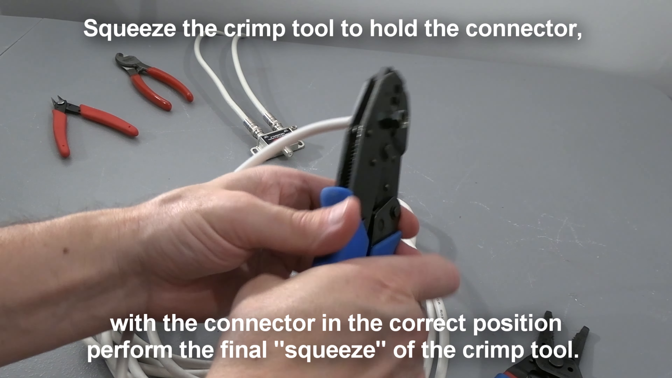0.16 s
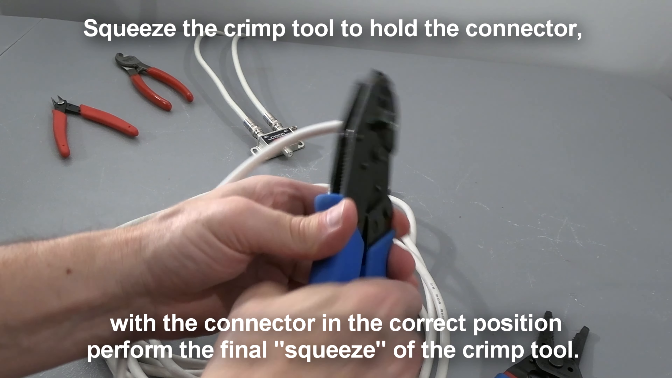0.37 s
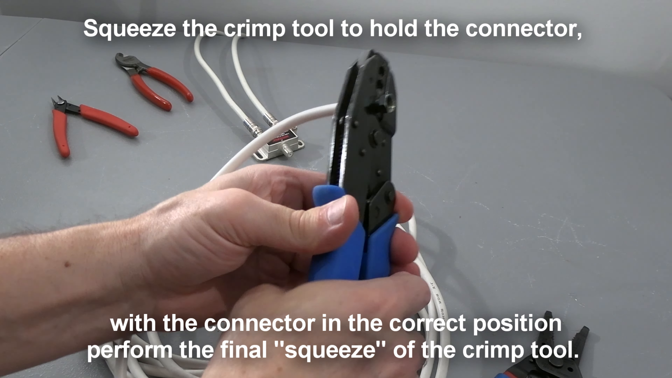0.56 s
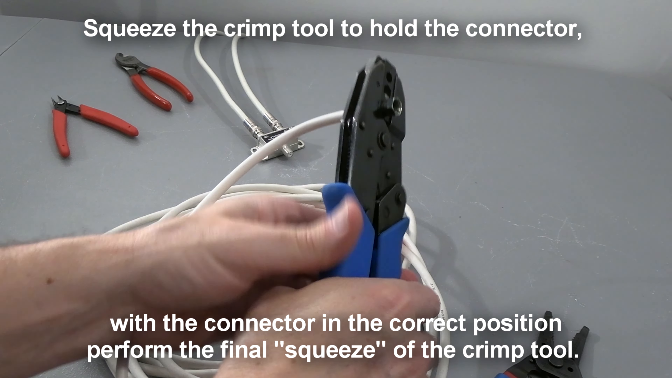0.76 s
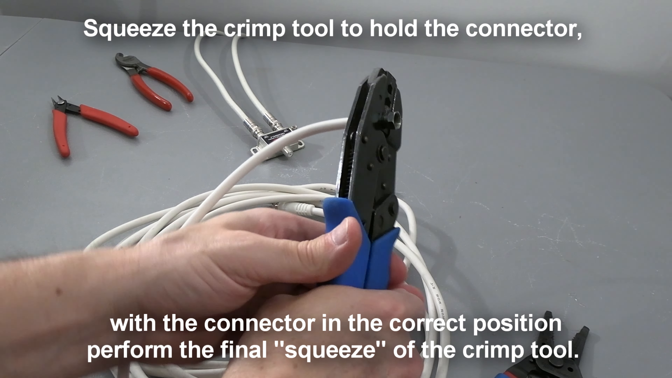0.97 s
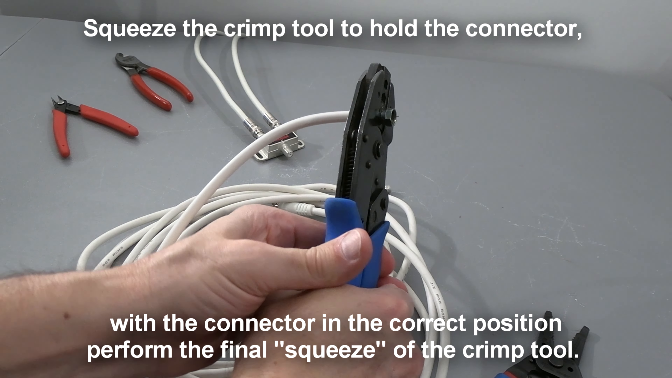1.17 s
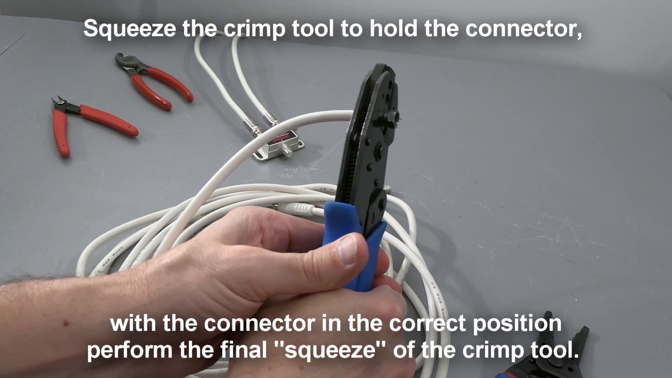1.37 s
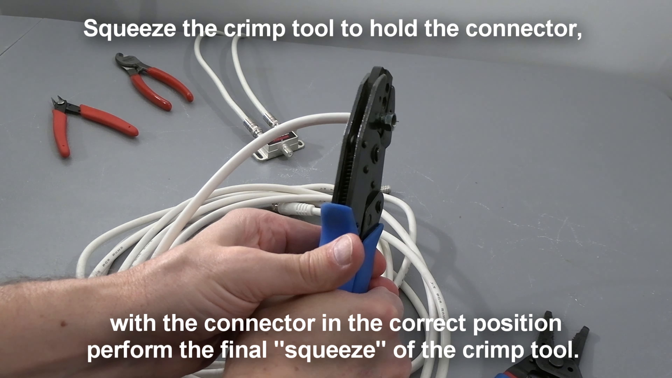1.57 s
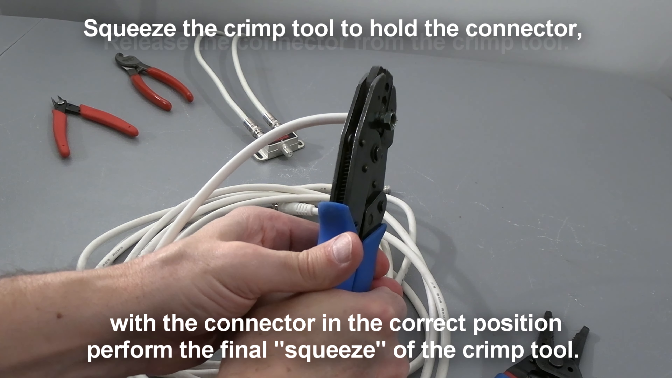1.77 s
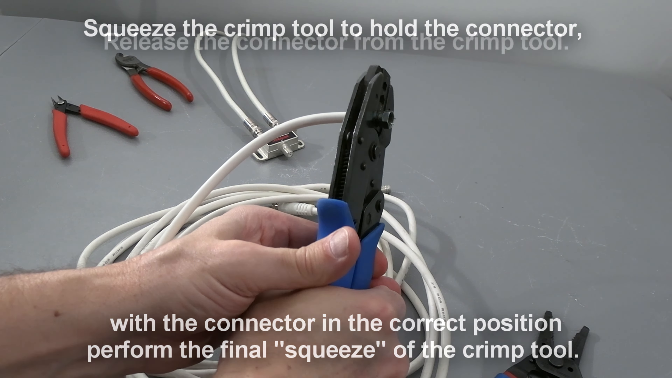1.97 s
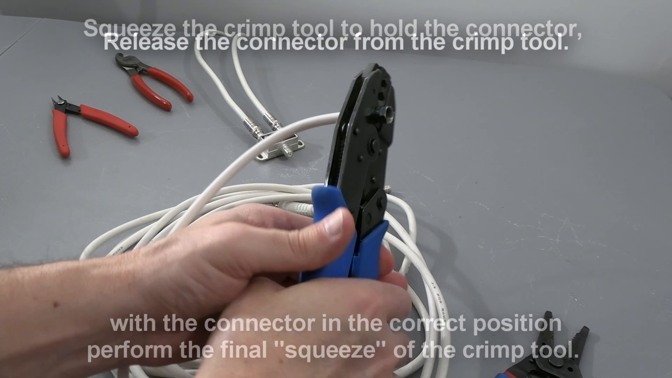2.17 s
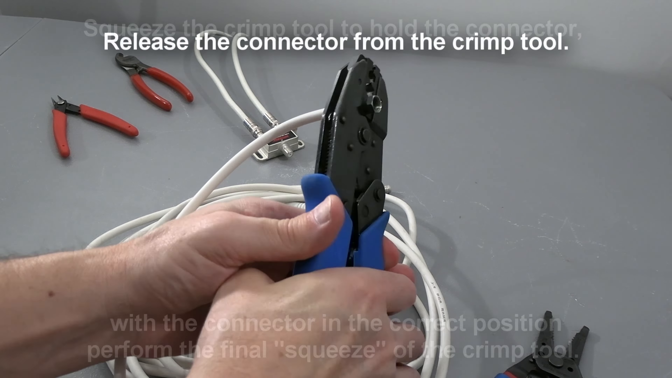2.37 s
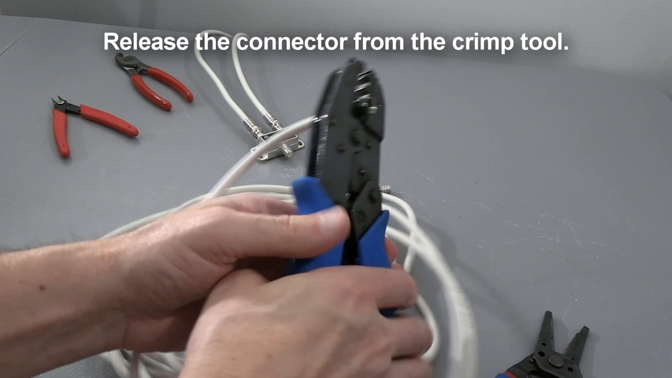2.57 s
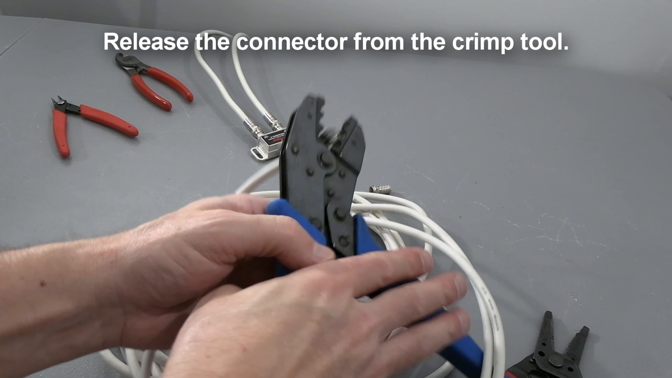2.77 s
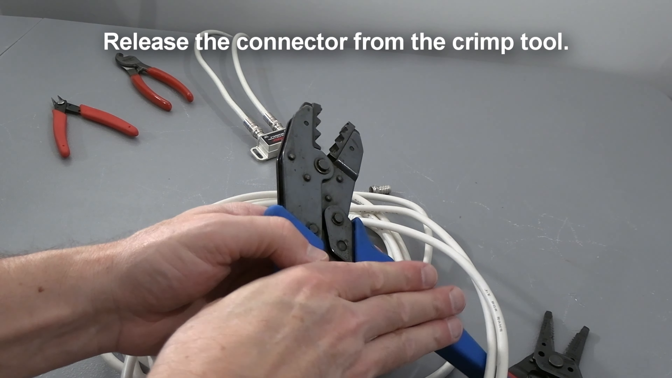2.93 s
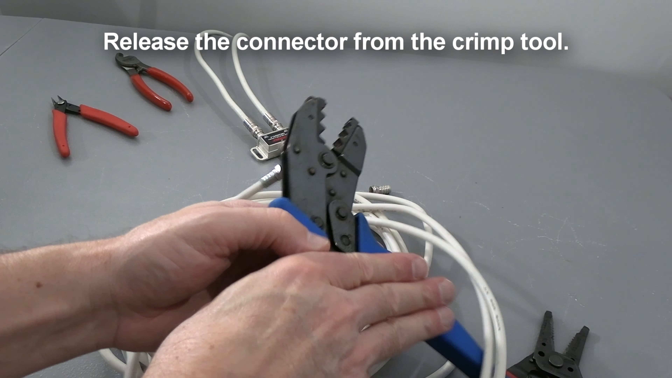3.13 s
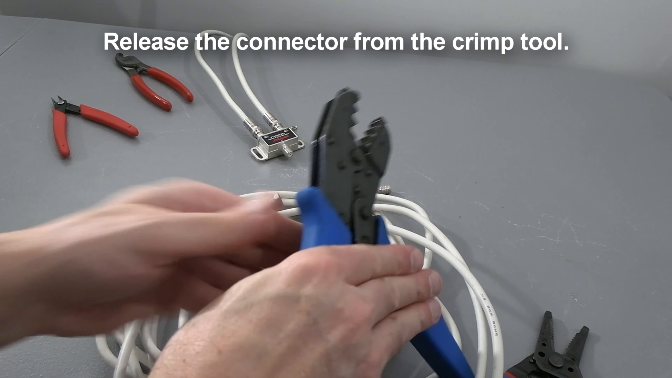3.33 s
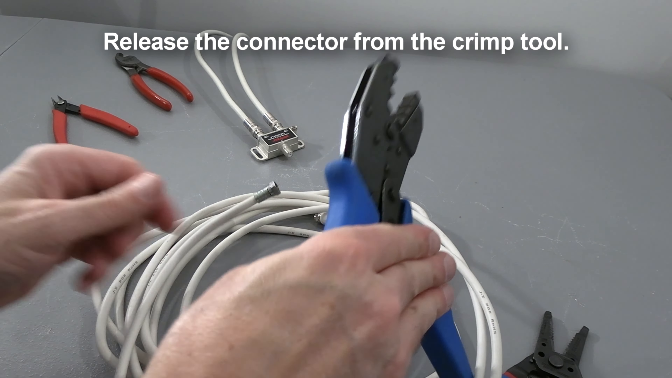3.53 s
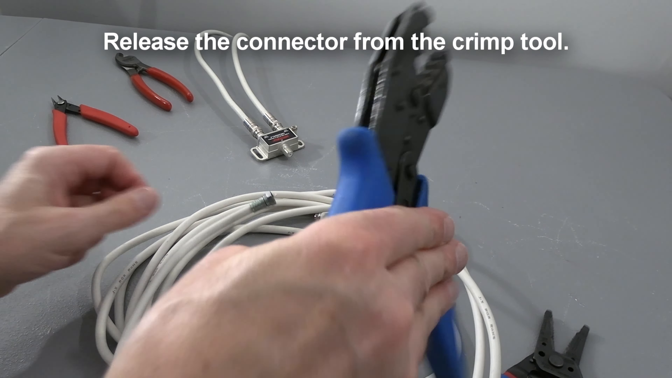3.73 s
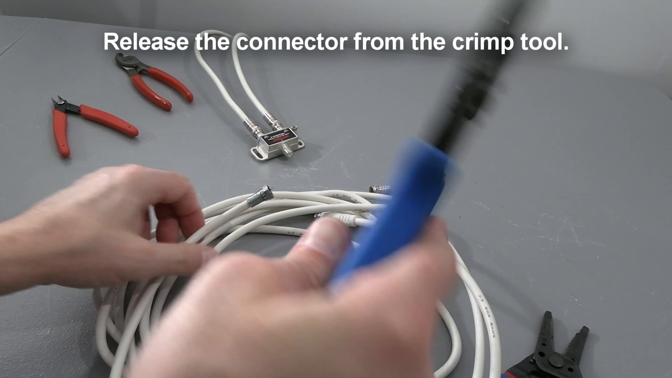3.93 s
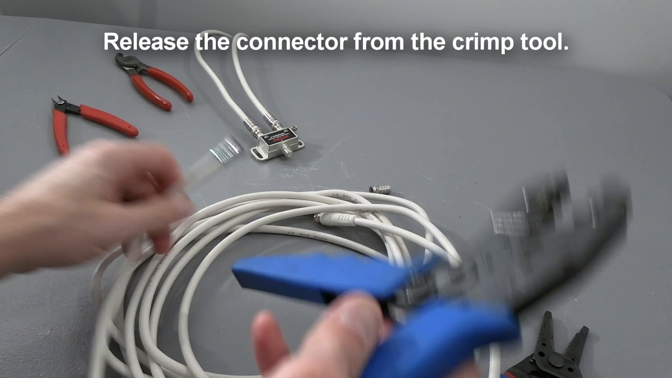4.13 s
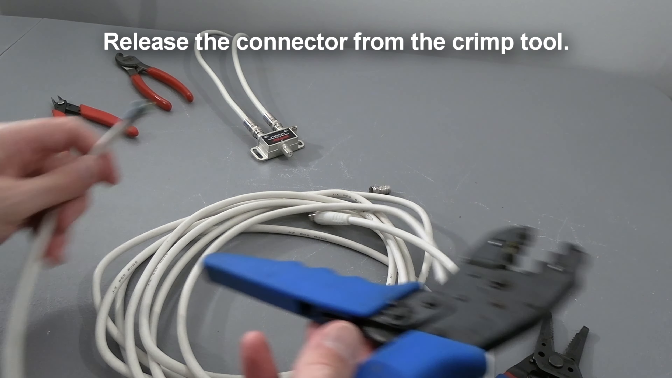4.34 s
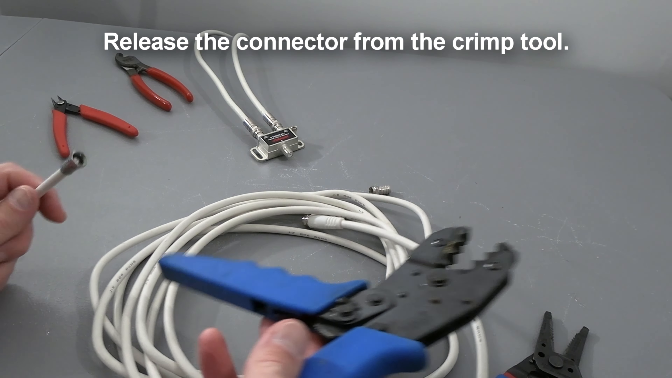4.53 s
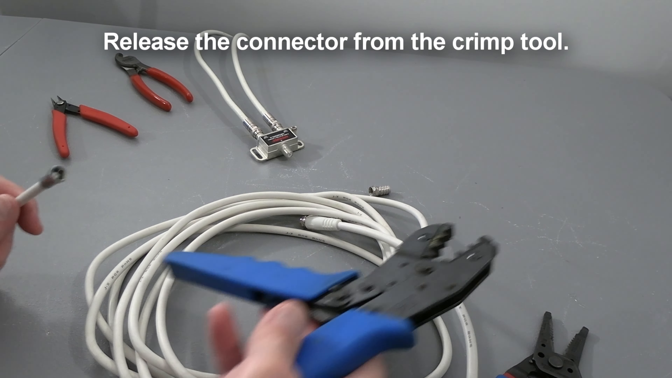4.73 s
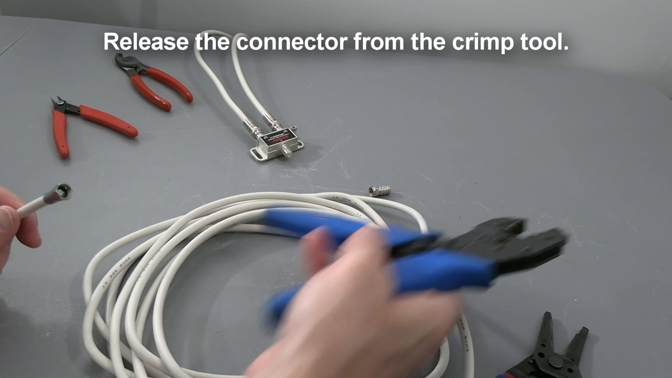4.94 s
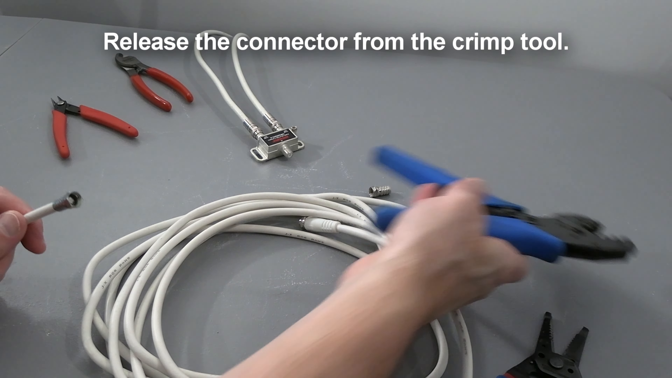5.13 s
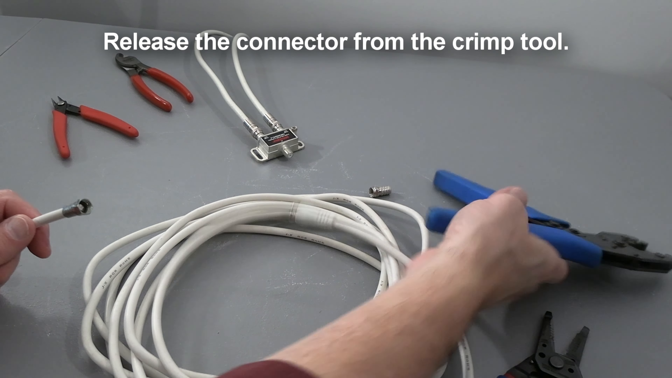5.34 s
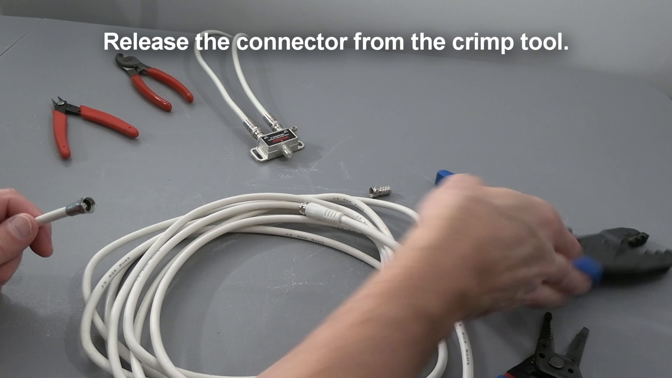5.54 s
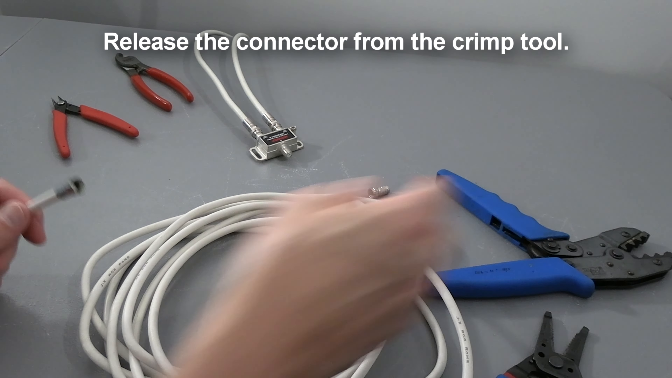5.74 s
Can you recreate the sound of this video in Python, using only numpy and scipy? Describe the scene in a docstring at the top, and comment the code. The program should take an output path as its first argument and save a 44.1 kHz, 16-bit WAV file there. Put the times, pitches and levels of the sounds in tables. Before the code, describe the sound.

A close stereo pickup in a small, fairly dry room with very faint air hiss. From 0.2 to 0.8 s there are weak steel ticks and light bumps of hands on a table. At about 1.0 s a ratchet tool gives one loud, crisp, short metal snap, followed by near quiet with barely any rubbing. At 2.3 to 2.4 s small ticks end in a clear click with a faint spring ring. From 2.6 to 2.8 s the pawl runs over about nine teeth, speeding into a bright rattle with the handle juddering. Soft bumps and grainy cable slides follow, with firmer knocks around 3.3 and 3.8 s, two muted low clicks near 4.1 s, and light knocks with a rustle at 4.3 to 4.6 s. After a lull, heavy clacks and thuds come at 5.4 to 5.5 s, then the loudest, a deep thud with hard rattle, at 5.7 s, trailing off with rubbing.

```python
"""In a small room, a ratcheting steel crimp tool is squeezed on a cable connector above a work table.
The jaws tick, the pawl snaps over teeth, then the ratchet runs free as the handles spring open.
Hands and cable bump and slide on the table, and the tool is put down on it with a few heavy clacks.
Steel and table are sums of damped modes with bursts of dense modes; sliding is grainy coloured noise;
the spring is pairs of beating sines; room reflections and a faint hush of air complete the field."""
import sys
import numpy as np
from scipy import signal
from scipy.fft import rfft, irfft, next_fast_len
from scipy.io import wavfile

SR = 44100
rng = np.random.default_rng(int(sys.argv[2]) if len(sys.argv) > 2 else 0)


def master_out(mix):
    """Clip the mix to full scale and print it as 16-bit PCM to the path in sys.argv[1]."""
    frames = np.transpose(np.atleast_2d(mix))
    ceiling = np.clip(frames, -1, 1)
    pcm = np.round(ceiling * 32767).astype(np.int16)
    wavfile.write(sys.argv[1], SR, pcm)


N = 255780
RING_S = .7  # longest ring computed
AGE = np.arange(int(RING_S * SR)) / SR  # seconds since a blow

# Room air and hiss: (frequency [Hz], density [dB per Hz, relative])
HUSH_SPECTRUM = [(15, -64), (25, -24), (242, -5.5), (270, -11.5), (463, -7.5), (591, -13.5), (641, -10.5),
                 (840, -2.5), (1020, -14), (1100, -7), (1610, -18), (1740, -14.5), (5140, -20),
                 (11900, -31.5), (16000, -60.5)]
HUSH_DB = -64.5

# Left-right likeness of diffuse sound: (frequency [Hz], correlation [-1 to 1])
EAR_LIKENESS = [(300, 0.98), (600, 0.79), (1000, 0.36), (2000, 0.66), (4000, 0.43), (8000, .72),
                (14000, .75)]

# Strokes of cable and hands over the table:
# (peak time [s], level before graining [dB], rise time constant [s], fall time constant [s])
STROKES = [(0.149, -61, .018, 0.013), (.455, -63, 0.011, 0.084), (1.2, -68, .3, 0.074),
           (2.3, -65.5, 0.1, 0.41), (2.88, -60, .12, 0.17), (3.385, -52.5, 0.058, .045),
           (3.787, -53, 0.068, 0.034), (4.552, -46, 0.028, 0.089), (4.861, -60, 0.42, 0.14),
           (5.75, -53.5, 0.32, 0.23)]
# Sliding friction: (frequency [Hz], density [dB per Hz, relative])
RUB_SPECTRUM = [(30, -41.5), (100, -7), (350, 4.5), (700, -1), (1200, 1.5), (2000, 4.5), (3100, -1.5),
                (4500, -17), (9000, -24.5), (15000, -40)]

# Knocks on the table: (time [s], thud energy [dB], thud centre [Hz], clack energy [dB],
# clack tilt [dB per octave], mean time to the first bounce [s])
KNOCKS = [(0.1899, -29.5, 250, -25, -7.5, 0.0031), (0.301, -31.5, 250, -23, -0.5, 0.0079),
          (1.225, -30, 259, -34.5, 9, .018), (2.149, -25, 301.6, -35, 0, .014),
          (2.809, -15.5, 327, -18.5, -8.5, .018), (2.929, -19, 397, -28.5, -4, .044),
          (3.222, -22, 398, -27.5, 1, .009), (3.32, -19.5, 225, -25, 1.5, .003),
          (3.338, -10.5, 190, -13, 0.5, .023), (3.452, -18, 249, -21.5, 1, .004),
          (3.792, -6.5, 330, -11.5, 0, .004), (3.856, -4.5, 203, -5.5, 2, .004),
          (3.929, -15, 223, -17.5, 0.5, .03), (4.296, -18, 350, -12.5, -4, .016),
          (4.424, -20, 249, -15, -7, .005), (4.447, -13, 291, -28.5, 8, .007),
          (4.61, -25.5, 301, -24, -5, .015), (5.27, -19, 330, -25, -9, .01),
          (5.308, -15.5, 286, -23, -1, .007), (5.371, 2, 384, 1.5, 3, .004),
          (5.432, 8.5, 145, 7.5, -1, .011), (5.509, -2, 310, -3, 2.5, .03),
          (5.6638, 5.5, 317, 4, 6.5, .006), (5.672, 18.5, 205, 15, 2, .022), (5.786, 0, 273, -1.5, 0, .008)]
# Modes of the table top: (frequency [Hz], relative energy [dB], t60 [s])
TABLE_MODES = [(106.8, -10, 0.23), (137.7, -7, .52), (169.5, -6, 0.22), (224, -14, 0.43),
               (256.1, -12.5, 0.27), (285.4, -6.5, 0.24), (331.2, -10.5, 0.11), (399.6, -7, 0.1),
               (434.2, -7.5, 0.21), (541, -12, 0.385), (560, -18.5, 0.15), (597, -11.5, 0.17)]
# Modes that ring in a hard clack: (frequency [Hz], relative energy [dB], t60 [s])
CLATTER_MODES = [(895, -9.5, 0.14), (1097, -11, 0.12), (1128, -3, 0.19), (1644, -9, .18), (1564, -2, 0.28),
                 (1730, 4.5, 0.13), (1828, 5, 0.038), (1893, 2.5, 0.21), (2000, 5, 0.13), (2560, -17, 0.29),
                 (2920, -23, 0.23)]
# Dense modes under a thud: (frequency [Hz], density [dB per Hz, relative])
THUD_SPECTRUM = [(25, -32), (45, -40.5), (70, -14.5), (120, -15), (200, -8.5), (330, -0.5), (460, -4),
                 (650, -5), (900, -11), (1500, -51)]
# Dense modes under a clack: (frequency [Hz], density [dB per Hz, relative])
CLACK_SPECTRUM = [(250, -28), (600, -12.5), (820, -3), (1050, 3), (1350, -4), (1800, 7), (2300, 0),
                  (3100, -5), (4200, -16), (6500, -27.5), (10000, -36), (15000, -68.5)]

# On average each bounce is quicker than the one before; each is weaker
BOUNCE_SHRINK, BOUNCE_THUD_LOSS_DB, BOUNCE_CLACK_LOSS_DB = .92, 6.5, 3
CUSHION_DB = 3  # knocks with a clack below 0 dB land on the cable and lose this much more clack per bounce

# Each knock makes the tool's joints click, this far under its clack
JOLT_DB, JOLT_LAG_S, JOLT_TILT_DB, JOLT_HZ = -16, .003, -3.5, 7550

# Single steel clicks of jaws and pawl:
# (time [s], energy [dB], treble tilt [dB per octave], most favoured pitch [Hz])
CLICKS = [(0.2769, -26, 0.5, 2500), (0.3011, -17.5, -4, 1970), (0.3401, -21, -4, 2460),
          (0.442, -21.5, -4.5, 3600), (0.4679, -28, 0, 3600), (0.722, -34, 0.5, 3550),
          (0.7442, -29.5, -1, 3480), (0.7612, -28.5, -3, 3100), (0.981, -14.5, 1.5, 2500),
          (.9846, 9.5, 0, 3240), (2.2684, -29, 1.5, 2500), (2.312, -29.5, 2.5, 3200),
          (2.334, -24.5, 0, 4700), (2.368, -3.5, 1, 3800), (4.0901, -24.5, -7, 1100),
          (4.116, -21, -8.5, 2410)]
# Modes of the tool, damped by the hand: (frequency [Hz], relative energy [dB], t60 [s])
STEEL_MODES = [(1073, -11.5, 0.029), (2010, -8.5, 0.0071), (2492, -2, 0.012), (3232, -4.5, 0.017),
               (3610, -4, 0.0086), (4660, -8, 0.007), (5860, -13.5, 0.0039), (6306, -9.5, .006),
               (7650, -12, 0.0085), (8370, -8, .005), (9420, -11, 0.0048), (10850, -21, .006),
               (13500, -32, .005)]
# The crack of steel: (frequency [Hz], density [dB per Hz, relative])
CRACK_SPECTRUM = [(30, -43), (200, -21), (600, -15), (1100, -2.5), (2000, -1), (7000, -4), (10000, -8.5),
                  (12500, -15), (16000, -28.5)]
# Close, longer-lived modes of the loose links: (frequency [Hz], density [dB per Hz, relative])
LINKS_SPECTRUM = [(700, -38.5), (1090, 3), (1500, -21), (2500, -7), (2900, -8.5), (3300, 2), (3800, 1),
                  (4300, -19.5), (6700, -16.5), (10000, -35)]
# The pawl spring sings when plucked: (time [s], frequency [Hz], level of the main sine [dB], t60 [s])
SPRING = [(2.268, 3327, -66, .4), (2.29, 4129, -64, 1.0), (2.753, 7262, -64, .6), (2.767, 6643, -64, .8),
          (2.767, 7084, -64, .8)]

# The pawl runs over the teeth as the handles spring open: (time [s])
TEETH = [2.6017, 2.652, 2.681, 2.7117, 2.7297, 2.741, 2.7518, 2.767, 2.7852]
# Energy at top speed; its growth with speed; the hand brakes the last tooth
TOOTH_DB, TOOTH_DB_PER_DOUBLING, LAST_TOOTH_DB = 1.5, 3.8, -3
# Treble tilt per octave; range of the favoured pitch
TOOTH_TILT_DB, TOOTH_LOW_HZ, TOOTH_HIGH_HZ = 5.5, 2080, 4470

# Every tooth but the last kicks the handle against the table
KICK_THUD_DB, KICK_CLACK_DB, KICK_TILT_DB = -24, -4.5, 4.5
# Meanwhile the handle judders across the table, ever harder: settings at the end of the run, then the swell
JUDDER_THUD_DB, JUDDER_THUD_HZ, JUDDER_CLACK_DB, JUDDER_TILT_DB = -14.5, 390, -7.5, -2.5
JUDDER_THUD_SWELL_DB, JUDDER_CLACK_SWELL_DB = 5, 5

# Decay of the room: (frequency [Hz], t60 [s])
ROOM_T60 = [(150, 1), (1000, 0.32), (3000, 0.26), (7000, 0.26), (14000, 0.11)]
# Colour of reflected sound: (frequency [Hz], density [dB per Hz, relative])
ROOM_COLOUR = [(60, -14.5), (250, -7.5), (500, -2.5), (1100, 0.5), (3000, 0), (7000, 0), (11000, -1),
               (16000, -2)]
CUTOFF_HZ = 15900


def amp(db):
    """Level law: 20 dB is a tenfold amplitude."""
    return 10 ** (np.asarray(db) / 20)


def unit_energy(x):
    """Energy normalisation: scale to a mean sum of squares of 1 per channel."""
    return x / np.sqrt(np.mean(np.sum(x ** 2, axis=-1)) + 1e-20)


def at_hz(points, hz):
    """Logarithmic pitch: interpolate a table along a log-frequency axis."""
    freqs, values = np.transpose(points)
    return np.interp(np.log(np.maximum(hz, 1)), np.log(freqs), values)


def add(track, s, sound):
    """Superposition: mix a sound in at time s."""
    start = int(s * SR)
    track[..., start:start + sound.shape[-1]] += sound[..., :N - start]


def noise(spectrum, size, tilt_db=0):
    """Partial coherence: a shared and an opposed random part make coloured stereo noise of rms 1."""
    hz = np.fft.rfftfreq(size, 1 / SR)
    mid, side = np.exp(2j * np.pi * rng.random((2, len(hz))))
    alike = np.clip(at_hz(EAR_LIKENESS, hz), -1, 1)
    octaves = np.log2(np.maximum(hz, spectrum[0][0]))
    gain = amp(at_hz(spectrum, hz) + tilt_db * octaves)
    pair = np.sqrt(1 + alike) * mid + np.sqrt(1 - alike) * side * [[1], [-1]]
    audible = hz > 10
    return unit_energy(irfft(gain * pair * audible, size)) * np.sqrt(size)


def ring(hz, t60):
    """Damped oscillation: one sine under an exponential decay from 1."""
    return np.sin(2 * np.pi * hz * AGE) * amp(-60 * AGE / t60)


def rings(modes, lag_s=0):
    """Dispersion: bending waves are slower at low pitch; 1 kHz arrives lag_s late. Unit-energy rows."""
    rows = []
    for hz, _, t60 in modes:
        delay_s = lag_s * np.sqrt(1000 / hz)
        rows.append(unit_energy(np.interp(AGE - delay_s, AGE, ring(hz, t60), left=0)))
    return np.array(rows)


def dense_modes(spectrum, t60, rise_s, tilt_db=0):
    """High modal density: countless modes struck at once merge into coloured noise that dies away."""
    age = AGE[:next_fast_len(int(t60 * SR) + 256)]
    envelope = amp(-60 * age / t60) * (1 - np.exp(-age / rise_s))
    out = np.zeros((2, len(AGE)))
    out[:, :len(age)] = noise(spectrum, len(age), tilt_db) * envelope
    return unit_energy(out)


def strike(modes, shapes, spread_db=0, colour_db=0):
    """Modal excitation: the spot struck sets the signs, and with a spread the strengths, of the modes."""
    scatter_db = spread_db * rng.standard_normal(len(modes))
    gains = amp(np.array(modes)[:, 1] + colour_db + scatter_db)
    signs = rng.choice([-1, 1], len(modes))
    return unit_energy(np.einsum("m,mt->t", gains * signs, shapes))


def hush():
    """Stationary random noise: room air and hiss at a constant level."""
    return amp(HUSH_DB) * noise(HUSH_SPECTRUM, N)


def sliding(catches_per_s=220, grain_db=2.5):
    """Stick-slip friction: the cable jacket catches and slips in uneven grains as strokes swell and fade."""
    t = np.arange(N) / SR
    catches = np.cumsum(rng.exponential(1, 4096)) / catches_per_s
    grip = amp(np.interp(t, catches, grain_db * rng.standard_normal(len(catches))))
    strokes = []
    for s, level_db, rise_s, fall_s in STROKES:
        time_constants_away = np.maximum((s - t) / rise_s, (t - s) / fall_s)
        strokes.append(amp(level_db) * np.exp(-time_constants_away))
    return np.max(strokes, axis=0) * grip * noise(RUB_SPECTRUM, N)


def bounces(count=4):
    """Inelastic impact: each knock lands and bounces three times, losing energy at every contact."""
    # rows: (time [s], thud energy [dB], thud centre [Hz], clack energy [dB], tilt [dB per octave])
    contacts = []
    for s, thud_db, thud_hz, clack_db, tilt_db, gap_s in KNOCKS:
        clack_loss_db = BOUNCE_CLACK_LOSS_DB + CUSHION_DB * (clack_db < 0)
        for k in range(count):
            bounce_thud_db = thud_db - k * BOUNCE_THUD_LOSS_DB
            bounce_clack_db = clack_db - k * clack_loss_db
            contacts.append((s, bounce_thud_db, thud_hz, bounce_clack_db, tilt_db))
            s = s + gap_s * BOUNCE_SHRINK ** k * rng.uniform(.9, 1.1)
    return [contact for contact in contacts if contact[0] < N / SR]


def judder(count=12):
    """Repeated impact: each tooth but the last kicks the handle, which skips unevenly in between."""
    # rows as for bounces
    contacts = [(s, KICK_THUD_DB, JUDDER_THUD_HZ, KICK_CLACK_DB, KICK_TILT_DB) for s in TEETH[:-1]]
    progress = (np.arange(count) + rng.random(count)) / count
    for p in progress:
        s = TEETH[0] + p * (TEETH[-1] - TEETH[0])
        thud_db = JUDDER_THUD_DB - (1 - p) * JUDDER_THUD_SWELL_DB
        clack_db = JUDDER_CLACK_DB - (1 - p) * JUDDER_CLACK_SWELL_DB
        contacts.append((s, thud_db, JUDDER_THUD_HZ, clack_db, JUDDER_TILT_DB))
    return contacts


def table(dense_db=-5.0, focus_db=6, clatter_db=-6, contact_db=2, thud_t60=.19, clack_t60=.19,
          contact_t60=.028):
    """Plate modes under impact: a blow's weight booms in the table top; hard contact cracks and clatters."""
    out = np.zeros((2, N))
    top_shapes, clatter_shapes = rings(TABLE_MODES), rings(CLATTER_MODES)
    attack = 1 - np.exp(-AGE / 0.00067)
    top_hz = np.array(TABLE_MODES)[:, 0]
    clatter_octaves = np.log2(np.array(CLATTER_MODES)[:, 0])
    for s, thud_db, thud_hz, clack_db, tilt_db in bounces() + judder():
        # a softer, longer contact wakes lower modes: its thud centre is lower
        octaves_off = np.abs(np.log2(top_hz / thud_hz))
        boom = attack * strike(TABLE_MODES, top_shapes, colour_db=-focus_db * octaves_off)
        thud = boom + amp(dense_db) * dense_modes(THUD_SPECTRUM, thud_t60, rise_s=0.0019)
        # above 0 dB, heavier clacks hold less contact and relatively more rattle
        contact_gain = amp(contact_db - .5 * max(clack_db, 0))
        contact = contact_gain * dense_modes(CLACK_SPECTRUM, contact_t60, rise_s=0.000092, tilt_db=tilt_db)
        rattle = dense_modes(CLACK_SPECTRUM, clack_t60, rise_s=0.0006, tilt_db=tilt_db)
        ringing = strike(CLATTER_MODES, clatter_shapes, spread_db=2, colour_db=tilt_db * clatter_octaves)
        clack = contact + rattle + amp(clatter_db) * ringing
        add(out, s, amp(thud_db) * unit_energy(thud) + amp(clack_db) * unit_energy(clack))
    return signal.sosfilt(signal.butter(2, 65, "high", fs=SR, output="sos"), out)


def jolts():
    """Transmitted shock: the loose joints click just after each knock. Rows as for CLICKS."""
    return [(s + JOLT_LAG_S, clack_db + JOLT_DB, JOLT_TILT_DB, JOLT_HZ)
            for s, _, _, clack_db, _, _ in KNOCKS]


def pawl_run():
    """Impact grows with speed: faster teeth drop the pawl harder, each at its own pitch. Rows as CLICKS."""
    speed = 1 / np.gradient(TEETH)
    levels_db = TOOTH_DB + TOOTH_DB_PER_DOUBLING * np.log2(speed / speed.max())
    levels_db[-1] += LAST_TOOTH_DB
    pitches = rng.permutation(np.geomspace(TOOTH_LOW_HZ, TOOTH_HIGH_HZ, len(TEETH)))
    return [(s, level_db, TOOTH_TILT_DB, hz) for s, level_db, hz in zip(TEETH, levels_db, pitches)]


def spring(beat_hz=17):
    """Beating: the coil bends in two planes, whose close pitches interfere."""
    out = np.zeros((2, N))
    for s, hz, level_db, t60 in SPRING:
        add(out, s, amp(level_db) * (ring(hz, t60) + .5 * ring(hz + beat_hz, t60)))
    return out


def ratchet(crack_db=-4.5, crack_t60=.018, rise_s=0.00055, focus_db=3, links_db=-20, links_t60=.5):
    """Impact of steel on steel: a brief crack, the short ring of plates and a faint shimmer of links."""
    out = np.zeros((2, N))
    shapes = rings(STEEL_MODES, lag_s=.0012)
    octaves = np.log2(np.array(STEEL_MODES)[:, 0])
    attack = 1 - np.exp(-AGE / rise_s)
    for s, level_db, tilt_db, main_hz in CLICKS + pawl_run() + jolts():
        # the place of contact favours the modes near one pitch
        favour_db = focus_db * np.exp(-10 * (octaves - np.log2(main_hz)) ** 2)
        colour_db = tilt_db * octaves + favour_db
        plates = unit_energy(attack * strike(STEEL_MODES, shapes, spread_db=2.5, colour_db=colour_db))
        crack = amp(crack_db) * dense_modes(CRACK_SPECTRUM, crack_t60, rise_s, tilt_db)
        # bright ticks hardly stir the links
        links_gain = amp(links_db - 3 * max(tilt_db, 0))
        links = links_gain * dense_modes(LINKS_SPECTRUM, links_t60, rise_s)
        add(out, s, amp(level_db) * unit_energy(plates + crack + links))
    # parts this small radiate little bass
    small_parts = signal.butter(2, 650, "high", fs=SR, output="sos")
    return signal.sosfilt(small_parts, out + spring())


def room(x, wet_db, echo_db, echo_s=.0058, gap_s=.004, echo_t60=.06):
    """Reverberation: quick bounces off near surfaces and a wall tail whose treble dies first."""
    bins = rfft(noise(ROOM_COLOUR, len(AGE)))
    hz = np.fft.rfftfreq(len(AGE), 1 / SR)
    centres, t60s = np.transpose(ROOM_T60)
    tail = 0
    # overlapping bands, each with its own decay
    for band, t60 in zip(np.eye(len(t60s)), t60s):
        band_gain = at_hz(np.c_[centres, band], hz)
        tail = tail + irfft(bins * band_gain, len(AGE)) * amp(-60 * AGE / t60)
    response = np.zeros((2, 2 * len(AGE)))
    add(response, gap_s, amp(wet_db) * unit_energy(tail))
    add(response, echo_s, amp(echo_db) * dense_modes(ROOM_COLOUR, echo_t60, rise_s=0.0004))
    return x + signal.fftconvolve(x, response, axes=1)[:, :N]


def scene():
    """Superposition of sources: bumps and tool excite the room; sliding and air are added directly."""
    air = hush()
    rub = sliding()
    bumps = room(table(), wet_db=-11.0, echo_db=-22.5)
    tool = room(ratchet(), wet_db=-9.5, echo_db=-10.5)
    balance = amp([[-.2], [.2]])  # left, right
    return (tool + bumps + rub) * balance + air


def record(dry):
    """Band limitation: a steep elliptic low-pass cuts the top."""
    return signal.sosfilt(signal.ellip(10, .2, 80, CUTOFF_HZ, fs=SR, output="sos"), dry)


dry = scene()
out = record(dry)
master_out(out)
```